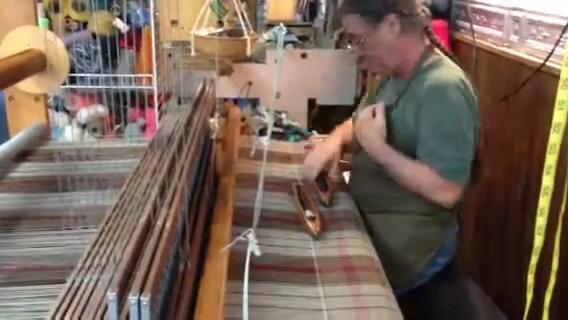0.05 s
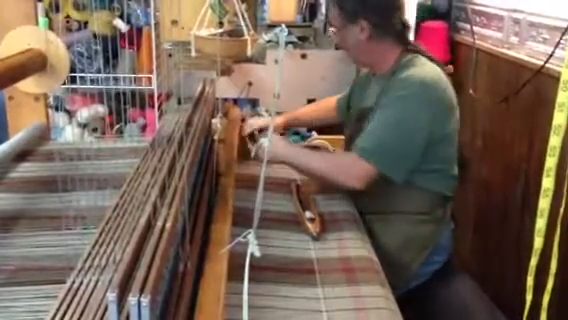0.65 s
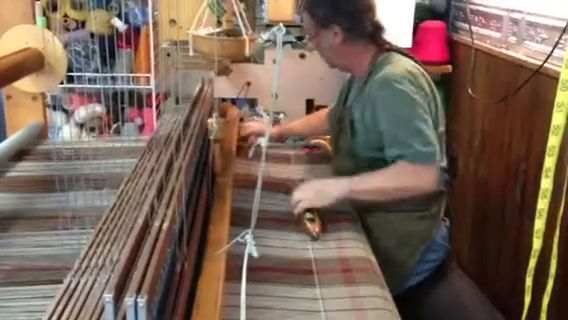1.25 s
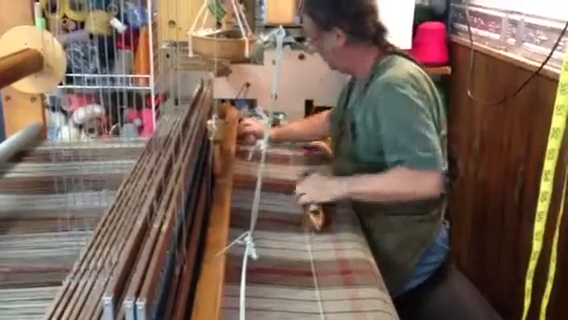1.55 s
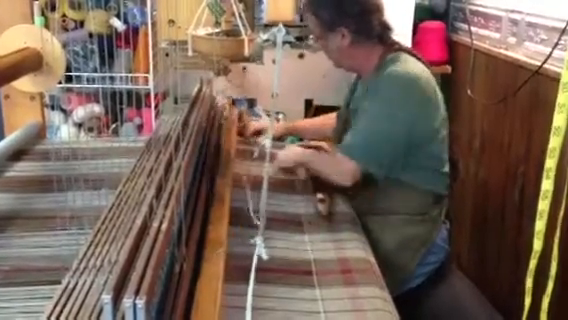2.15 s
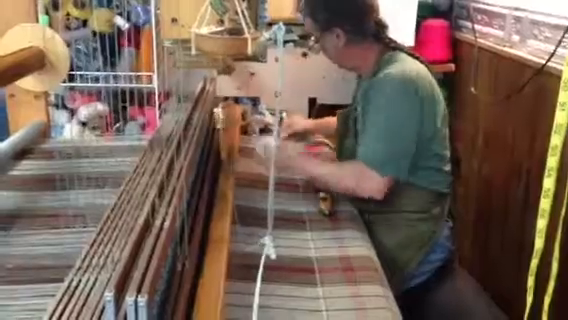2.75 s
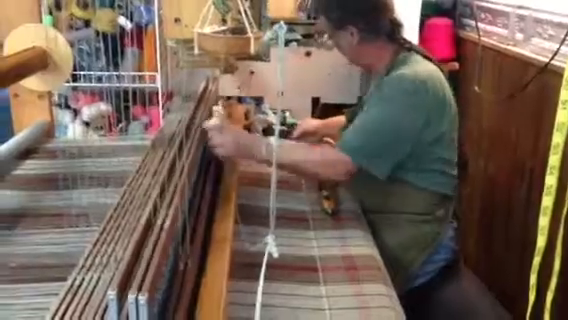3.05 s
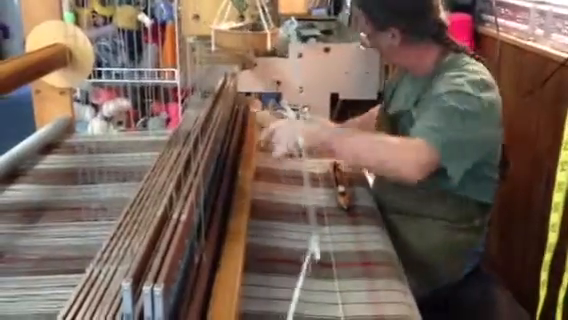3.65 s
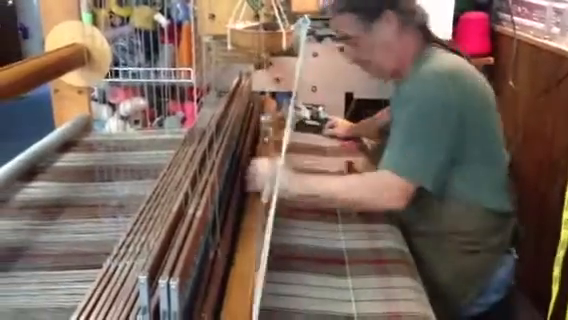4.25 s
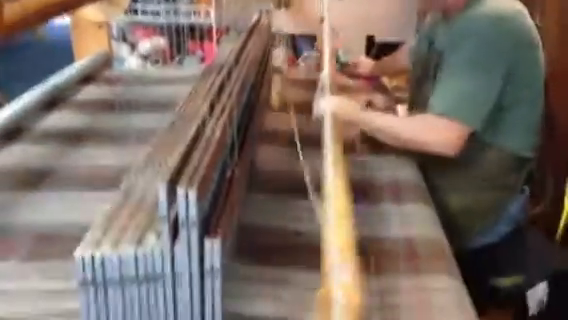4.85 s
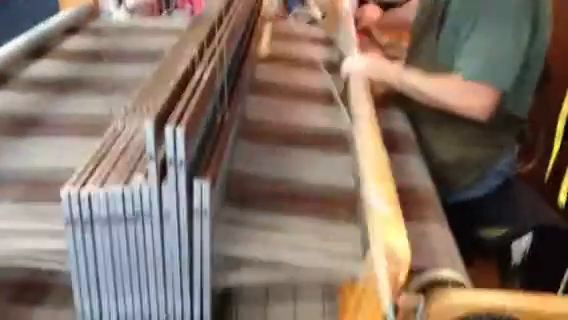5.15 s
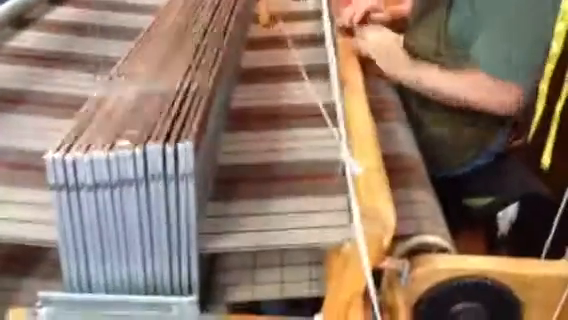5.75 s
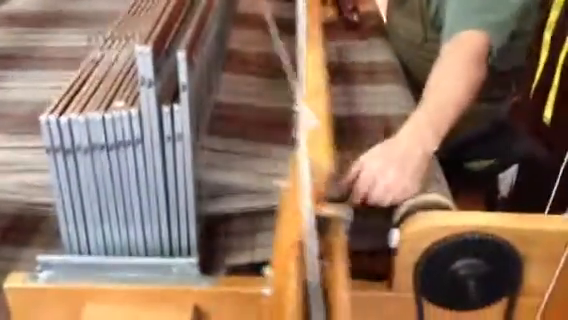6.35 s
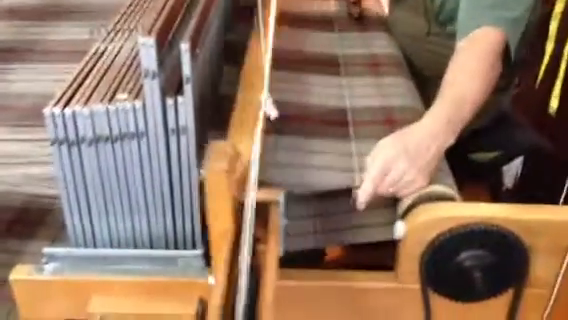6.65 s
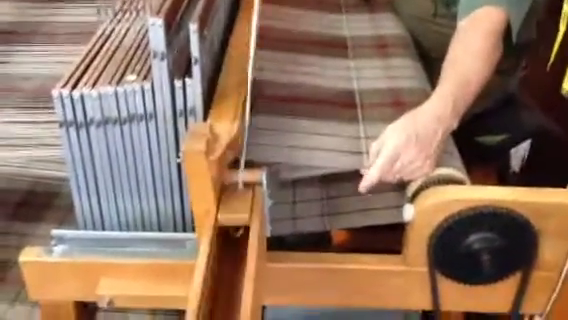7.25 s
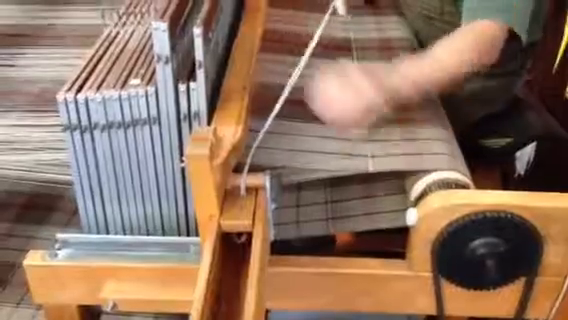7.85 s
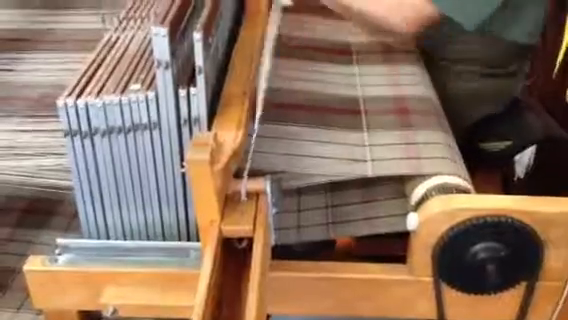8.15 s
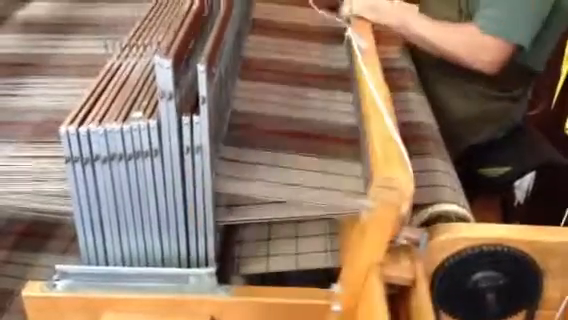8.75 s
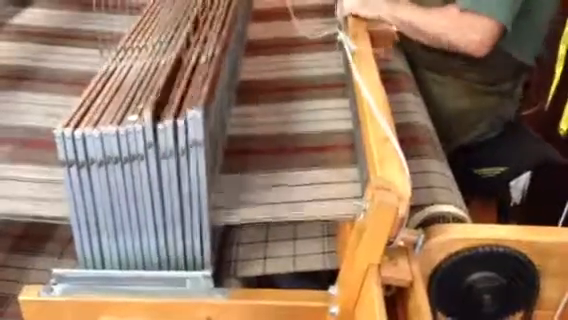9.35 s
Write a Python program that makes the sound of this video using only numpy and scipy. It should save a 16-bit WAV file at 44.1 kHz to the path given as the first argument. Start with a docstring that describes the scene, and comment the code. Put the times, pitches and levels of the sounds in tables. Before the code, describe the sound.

A wooden floor loom is worked close by in a small room. Light, hollow shuttle knocks come from about 0.4 to 1.6 seconds, with a brief wooden drone near 1.2. A sharp clack and a dull slide follow at 1.8, then lighter taps at 2.4. More knocks arrive around 3.5, then tiny gritty thread squeaks and a loud cluster of bright clacks at 4. The beater thumps the frame hard at 5.1, more softly at 6, and firmly at 7 and 8.8, with shuttle clacks between 7.1 and 7.9. Wire heddles rattle from 5.5 to 6 and again from 9 to 9.5, among more knocks. Small steel parts ping near 5.6, 6 and 6.7. Threads rustle and wood rubs on wood between blows, strongest near the end. Throughout, a faint street rumble and the muffled, repeatedly climbing hum of engines come through the wall.

```python
"""A wooden floor loom is worked in a small room, heard from close by in mono.
Shuttle, beater and treadles knock on the frame and ring its modes; the swinging beater makes it drone.
Metal fittings ping, wire heddles rattle as the shafts change, and taut thread squeaks over wood.
In between, warp and cloth rustle and wood slides on wood. Behind it all, a muffled hum climbs again
and again as engines pull away outside."""
import sys
import numpy as np
from scipy import signal
from scipy.fft import rfft, irfft
from scipy.io import wavfile
from scipy.ndimage import uniform_filter1d, minimum_filter1d

SR = 44100
rng = np.random.default_rng(int(sys.argv[2]) if len(sys.argv) > 2 else 0)


def write(x):
    x = np.atleast_2d(x).T
    wavfile.write(sys.argv[1], SR, np.round(np.clip(x, -1, 1) * 32767).astype(np.int16))


N = 414540
TIME = np.arange(N) / SR
HIT_N = SR // 2
HIT_TIME = TIME[:HIT_N]

# Tone of wood rubbing on wood. Each row: frequency in Hz, gain in dB.
RUB_EQ = [(110, -40), (180, -9), (429, -7.5), (586, -4), (760, -9.5), (1050, -11.5), (1240, -9),
          (1930, -17), (2440, -19.5), (4000, -19), (5200, -56), (8800, -120)]


def shuttle_clacks():
    """The shuttle clacks against its box, bright and with little bass."""
    # Each row: start in seconds, level in dB, note in Hz, hardness in dB, scuff in ms, room send in dB.
    hits = [(0.431, -45, 2220, 7, 2.5, -7), (1.747, -25.5, 2430, -10, 17, 3),
            (1.76, -22, 3365, -0.5, 2, -2), (2.403, -36, 1370, -10, 3.8, 3.5),
            (2.448, -37, 2098, -5.5, 6.6, -6.5), (3.36, -30, 1710, -4, 4.5, 2),
            (3.567, -35, 1106, -3.5, 5.4, 0), (3.945, -30.5, 1857, -11.5, 6, 1),
            (3.952, -16, 1778, 3.5, 1.6, -5), (3.972, -24.5, 1870, -11.5, 1.8, -0.5),
            (4.006, -30.5, 1480, -18, 0.47, 8.5), (4.026, -19.5, 2030, 3.5, 1.5, -7.5),
            (4.062, -16, 1427, 4.5, 1.9, -10.5), (4.234, -43.5, 1530, -16, .4, -12),
            (7.141, -29.5, 1080, -0.5, 1, -4.5), (7.198, -42.5, 1920, 2, 4.9, -26.5),
            (7.256, -36.5, 1490, 1, 7.9, 4), (7.272, -18, 1545, -4, 0.21, -13.5),
            (7.363, -37, 1840, -1.5, 0.91, -5.5), (7.739, -25, 1735, -3.5, 4.9, 2),
            (7.854, -29, 2330, 3.5, 5.8, -0.5), (7.915, -41, 2000, -16, 1.5, -7)]
    return blows(hits, low_hz=930, high_hz=3400,
                 bass_db=-29.5, bright_db=-3, snap_db=-14, air_db=-27.5, boom_db=-23.5)


def shuttle_knocks():
    """Shuttles knock hollowly as they are set down and picked up."""
    # Each row: start in seconds, level in dB, note in Hz, hardness in dB, scuff in ms, room send in dB.
    hits = [(0.705, -45.5, 1274, -4, 1.7, -0.5), (0.774, -39.5, 1390, 5.5, 9.5, -6),
            (0.886, -30, 1345, -7, 2, -5), (0.895, -31, 1280, -44, 3.2, 4.5),
            (1.024, -39, 1414, -3, 4.1, 7.5), (1.044, -36.5, 1420, 8.5, 7.5, 8),
            (1.139, -33.5, 1660, 3, 3.5, -2), (1.513, -42.5, 1170, 1, 2.3, 5.5),
            (1.582, -36, 1503, 2.5, 3.1, 3.5), (1.657, -46, 1080, 5.5, 9.6, -16),
            (3.446, -35, 1110, 12, 2.8, -2), (3.509, -29, 1734, 2.5, 5, -2.5),
            (4.576, -57, 1000, 6, 3.7, 4), (8.151, -49.5, 1660, -7, 2.7, -6.5),
            (8.214, -51, 1400, 2, 3.7, 5), (8.376, -50.5, 1070, 4, 1.3, -20),
            (8.503, -38.5, 1660, 12.5, 3.4, -2.5), (8.631, -34, 1250, -3, 4, -5),
            (9.328, -31, 1180, 7, 1.8, -2)]
    return blows(hits, low_hz=794, high_hz=2590,
                 bass_db=-6, bright_db=-11.5, snap_db=-31, air_db=-45, boom_db=-29.5)


def beater_thumps():
    """Beater and treadles thump the frame with weight behind them."""
    # Each row: start in seconds, level in dB, note in Hz, hardness in dB, scuff in ms, room send in dB,
    # weight as extra bass in dB.
    hits = [(4.812, -44, 1270, -13, 2.9, -4, 4), (5.116, -24, 1546, -3, 2.8, 6, -4.5),
            (5.133, -17.5, 1447, 5, 0.74, -5, -3), (5.158, -29.5, 1280, 8.5, 0.26, 0, -2),
            (5.206, -28, 1410, -4, 1.4, -18, 1.5), (5.273, -31.5, 1884, -25, 5.1, -6, -0.5),
            (5.41, -41.5, 1410, -24, 3.6, 3, 5.5), (5.993, -35, 1160, 17, 4.3, 0, 4),
            (6.029, -36, 1420, 12, 3.3, 2.5, -0.5), (6.122, -46.5, 1220, 10, 5.5, -3, 11),
            (6.973, -28, 1075, -9, 1.2, -10, 2.5), (6.981, -24, 1152, -3, 5, -5, 3.5),
            (7.0, -32.5, 1980, -13, 6, -17, 2.5), (8.758, -28, 1510, 7.5, 1.5, 1.5, -3.5),
            (8.789, -19, 1680, -2, 1.1, 1, -6), (8.838, -34, 1630, 12, 0.94, 1.5, 7),
            (8.954, -31, 1540, 0, 9.6, -9, -3.5)]
    return blows(hits, low_hz=606, high_hz=3040,
                 bass_db=-4.5, bright_db=-4, snap_db=-22, air_db=-38, boom_db=-17)


def reed_taps():
    """Reed, shaft bars and fittings give light, bright taps."""
    # Each row: start in seconds, level in dB, note in Hz, hardness in dB, scuff in ms, room send in dB.
    hits = [(3.123, -59, 2340, 8, 5.2, -13), (3.193, -64, 1940, 11.5, 0.33, -5),
            (3.643, -52.5, 1510, 6.5, 7.9, 1.5), (4.159, -45.5, 2120, -11, 3.1, -8.5),
            (4.781, -47, 1904, -7.5, 3.1, 2.5), (4.861, -37.5, 1580, -3, 0.97, -5),
            (5.617, -35.5, 1720, -3, 2.5, 0), (6.718, -43, 2240, 7.5, 1.25, -1.5),
            (6.887, -56, 1860, 8, 3.7, 2), (7.123, -36, 1120, -13.5, 3.3, -22),
            (8.016, -44.5, 2180, -0.5, 2.9, 0.5), (8.421, -44, 1780, -6.5, 7, -8),
            (9.197, -27.5, 1190, -2, 4.5, -2), (9.232, -34.5, 1230, 0, 1.8, -2),
            (9.374, -33.5, 2080, -15, 2.8, -5)]
    return blows(hits, low_hz=714, high_hz=3750,
                 bass_db=-6.5, bright_db=0, snap_db=-3, air_db=-17, boom_db=-26)


def blows(hits, low_hz, high_hz, bass_db, bright_db, snap_db, air_db, boom_db,
          plain_note_hz=1483, longest_t60=0.087, gain_db=26, room_trim_db=-3.5):
    """Each blow is a run of tiny contacts that ring the frame, the struck part and the room."""
    # Resonances of the frame. Each row: frequency in Hz, width in Hz, level in dB.
    frame = [(330, 17, 2.5), (547, 15, 3), (666, 21, -4.5), (800, 70, -9), (1080, 84, -2),
             (1348, 90, -10.5), (1380, 100, 2), (1657, 340, 3.5), (1970, 27, -4), (2093, 100, 2),
             (2290, 48, 0.5), (2490, 90, -1.5), (3090, 120, 5), (3344, 280, 6.5), (3844, 160, -2),
             (3730, 150, -8.5), (3950, 240, 6), (4480, 160, -1), (5140, 68, -10), (6860, 450, 2.5),
             (7400, 150, -9.5), (8960, 150, -11)]
    # Edges in Hz of the bass, middle, bright, snap and air bands.
    band_edges = [170, 700, 2400, 5200, 10000, 15500]
    modes = np.array([from_db(db) * struck(hz, min(ring_time(width), longest_t60))
                      for hz, width, db in frame])
    bands, tails, out = bank(band_edges), room_tails(count=4), np.zeros(N)
    low_cut = signal.butter(2, 380, "high", fs=SR, output="sos")   # slender parts radiate little bass
    for k, (s, db, mid_hz, hard_db, scuff_ms, room_db, *weight_db) in enumerate(hits):
        # the point of contact decides how strongly each mode answers
        strengths = from_db(3 * rng.standard_normal(len(modes))) * rng.choice([-1, 1], len(modes))
        pressure, contact = scuff(scuff_ms)
        body = through(contact, strengths @ modes)
        # the struck part adds three hollow notes; a firm blow rings the middle one more clearly
        pitch_ratio = mid_hz / plain_note_hz
        shift = pitch_ratio ** 0.3
        notes = ((low_hz * shift, -9 + 0.35 * bass_db),
                 (mid_hz, -3 + 0.21 * (db + 29)),
                 (high_hz * shift, -9))
        for hz, note_db in notes:
            body = body + from_db(note_db) * through(contact, struck(hz, t60=0.041))
        crack = wood_crack(pressure)
        boom = through(contact, struck(hz=185, t60=0.36))   # the whole frame booms on the floor
        direct = signal.sosfilt(low_cut, body + energy_one(crack)) + from_db(boom_db) * boom
        # the room hears all sides of the loom, so single notes stand out less in it
        radiated = energy_one(direct) + from_db(1) * energy_one(signal.sosfilt(low_cut, crack))
        echo = through(radiated, tails[k % len(tails)])
        # slow or heavy blows give more bass, high notes more brightness, hard contacts more top
        push_db = np.log2(scuff_ms / 3) + sum(weight_db)
        lift_db = 0.27 * hard_db + 9.5 * np.log2(pitch_ratio)
        eq_db = (bass_db + push_db, 0, bright_db + lift_db, snap_db + hard_db, air_db + 1.5 * hard_db)
        for sos, band_db in zip(bands, eq_db):
            near, far = signal.sosfilt(sos, signal.sosfilt(sos, [direct, echo]))
            band = energy_one(near) + from_db(room_db + room_trim_db) * energy_one(far)
            add(out, s, from_db(gain_db + db + band_db) * band)
    return out


def scuff(ms):
    """Pressure and chatter of a contact: a square hit is over at once, a glancing one slides."""
    progress = HIT_TIME * 1000 / ms
    pressure = energy_one(progress * np.exp(-progress))
    chatter = pressure * rng.standard_normal(HIT_N) ** 3
    for _ in range(3):   # bending waves disperse, so the lows arrive a little later
        chatter = signal.lfilter([-0.7, 1], [1, -0.7], chatter)
    return pressure, chatter


def wood_crack(pressure, t60=0.024):
    """The crowd of short modes between the strong ones blurs into a burst of noise."""
    envelope = np.sqrt(np.abs(through(pressure ** 2, dying(t60) ** 2)))
    return envelope * signal.lfilter([1], [1, -0.6], rng.standard_normal(HIT_N))


def fitting_pings(beat_hz=35, twin_db=-9):
    """Small steel parts ring with a close, beating pair of modes."""
    # Each row: start in seconds, level in dB, pitch in Hz, t60 in seconds.
    pings = [(4.784, -41, 10500, 0.062), (5.645, -29.5, 5220, 0.11), (5.996, -32, 5140, 0.21),
             (6.721, -23, 10470, 0.15), (8.42, -44, 10500, 0.072)]
    out = np.zeros(N)
    for s, db, hz, t60 in pings:
        tone = np.sin(2 * np.pi * hz * HIT_TIME)
        twin = from_db(twin_db) * np.sin(2 * np.pi * (hz + beat_hz) * HIT_TIME)
        add(out, s, from_db(db) * (tone + twin) * (dying(t60) - dying(0.0033)))
    return out


def thread_squeaks(jitter=0.07, grit_db=-3, room_db=-7, gain_db=1):
    """Taut thread sticks and slips over wood at an unsteady rate, in short gritty chirps."""
    # Each row: start in seconds, level in dB, pitch in Hz, length in seconds.
    chirps = [(3.675, -39.5, 1759, 0.024), (3.703, -39, 2026, 0.013), (3.758, -42, 1838, .028),
              (3.783, -40, 1966, 0.026), (3.81, -41, 1966, 0.021), (3.85, -38, 1912, 0.036),
              (3.88, -42.5, 1965, 0.017), (3.916, -40.5, 2092, 0.011), (7.532, -60.5, 2000, .014),
              (7.583, -58.5, 2150, .02), (7.628, -61, 1516, 0.025)]
    # Each row: harmonic number, level in dB.
    partials = [(1, 5.5), (2, 9.5), (3, -3), (4, -21)]
    out, wobble = np.zeros(N), drift(200)
    grit_band = signal.butter(2, (1500, 7500), "band", fs=SR, output="sos")
    for s, db, hz, length in chirps:
        unsteadiness = wobble[round(s * SR):][:HIT_N] + 4 * rng.standard_normal(HIT_N)
        phase = 2 * np.pi * np.cumsum(hz * (1 + jitter * unsteadiness)) / SR
        tone = rms_one(sum(from_db(partial_db) * np.sin(k * phase) for k, partial_db in partials))
        grit = rms_one(signal.sosfilt(grit_band, rng.standard_normal(HIT_N)))
        pull = np.sin(np.pi * np.sqrt(np.minimum(HIT_TIME / length, 1)))
        add(out, s, from_db(db + gain_db) * pull * (tone + from_db(grit_db) * grit))
    return out + from_db(room_db) * excite(out, room_tails(count=1)[0])


def frame_drone(gain_db=-3):
    """Friction in the swinging beater's pivots keeps a few frame modes ringing."""
    # Each row: peak time in seconds, level in dB, rise and fall in seconds.
    swings = [(1.17, -39, 0.039, .12), (3.1, -58, 0.052, .2), (4.9, -47.5, 0.18, 0.43),
              (8.63, -45.5, 0.25, 0.19)]
    # Each row: frequency in Hz, width in Hz, level in dB.
    resonances = [(700, 33, -14), (794, 16, 13), (830, 39, 12)]
    friction = grains(per_s=900, spread_db=1.5)
    modes = sum(from_db(db) * struck(hz, ring_time(width)) for hz, width, db in resonances)
    return from_db(gain_db) * swells(swings) * rms_one(excite(friction, modes))


def heddle_rattle(rattle_db=10.5, rumble_db=-9, attack_s=0.025, fall_db_per_s=230):
    """Hundreds of wire heddles jostle on their bars while the shaft frames rub in their guides."""
    # Each row: start in seconds, length in seconds, level in dB.
    shaft_changes = [(5.476, .19, -43.5), (5.781, 0.13, -42), (9.065, 0.16, -41), (9.367, .1, -35.5)]
    # Tone of the wires. Each row: frequency in Hz, gain in dB.
    wire_eq = [(530, -51), (900, -13), (1120, -16), (1420, -13), (2720, -5.5), (4180, 1), (4880, -3.5),
               (5570, 0.5), (7410, -5), (14100, -8), (15500, -14)]
    wires = sum(excite(grains(per_s=640, spread_db=0.5), noise_burst(t60=0.0097)[:1024])
                for _ in range(5))
    rattle = from_db(rattle_db - 0.5 * drift(30)) * coloured(wires, wire_eq)
    rumble = from_db(rumble_db) * coloured(grains(per_s=1100, spread_db=-2.5), RUB_EQ)
    motion = np.zeros(N)
    for s, length, db in shaft_changes:
        attack = np.clip((TIME - s) / attack_s, 0, 1)
        motion += attack * from_db(db - fall_db_per_s * np.maximum(TIME - s - length, 0))
    return motion * (rattle + rumble)


def thread_rustle(gain_db=1, tick_db=-7, idle_db=-73):
    """Threads catch and slip across the warp and in the reed; now and then one plucks free with a tick."""
    # Each row: peak time in seconds, level in dB, rise and fall in seconds.
    pulls = [(1.08, -68, 1, 0.8), (1.8, -62.5, .7, 0.8), (3.11, -56.5, .12, 1.6), (3.82, -58.5, .55, 0.28),
             (3.96, -44.5, 0.088, -0.01), (4.58, -58, .22, .25), (5.25, -55, 0.36, 1.0),
             (5.84, -50.5, 1.0, 1.07), (6.23, -50.5, 0.37, 0.37), (7.0, -50.5, 0.12, 0.16),
             (7.26, -59, 0.37, 1), (7.9, -63.5, 0.84, .3), (8.32, -62.5, 0.21, -0.1),
             (8.91, -45.5, 0.13, -0.3), (9.2, -40, 0.39, 0.3)]
    # Tone of the threads. Each row: frequency in Hz, gain in dB.
    thread_eq = [(530, -32.5), (900, -8), (1260, -27), (1450, -2.5), (1580, -8), (2000, -2.5), (4390, 1),
                 (13900, -13.5), (15500, -17.5)]
    strokes = swells(pulls)
    pulling = np.hypot(strokes, from_db(idle_db))
    catching_db = 1.5 * drift(45)
    ticks = rms_one(excite(grains(per_s=22, spread_db=3), noise_burst(t60=0.025)))
    fibres = rms_one(grains(per_s=7800, spread_db=1.5))
    texture = fibres + from_db(tick_db) * ticks * strokes / pulling
    return pulling * from_db(gain_db + catching_db) * coloured(texture, thread_eq)


def wood_slides(gain_db=-1, idle_db=-72):
    """Wood slides on wood with a dull, grainy rub."""
    # Each row: peak time in seconds, level in dB, rise and fall in seconds.
    slides = [(1.09, -50.5, 0.22, 0.27), (1.76, -37, 0.041, 0.17), (3.54, -42.5, .17, 0.33),
              (3.96, -38.5, .03, 0.26), (4.62, -70, 0.14, 0.14), (5.21, -36.5, 0.33, 0.17),
              (5.625, -35.5, 0.13, 0.096), (5.8, -38.5, 0.075, 0.072), (6.0, -40.5, 0.019, 0.26),
              (6.22, -58, 0.22, 1), (7.18, -49, 0.24, 0.36), (7.87, -41.5, 0.11, 0.13),
              (8.61, -46, 0.29, 0.37), (8.92, -40.5, 0.32, 0.34), (9.21, -31, 0.08, 0.098),
              (9.39, -31, 0.067, .12)]
    sliding = np.hypot(swells(slides), from_db(idle_db))
    return sliding * from_db(gain_db) * coloured(grains(per_s=1700, spread_db=2.5), RUB_EQ)


def room_tails(count, build_s=0.0044):
    """Diffuse reverb tails, one for each place on the loom; the top treble dies first."""
    # Each row: frequency in Hz, t60 in seconds.
    decay_times = [(200, 0.24), (500, 0.37), (1200, .38), (2500, 0.29), (5000, 0.18), (9000, 0.26),
                   (15000, 0.1)]
    edges = np.geomspace(100, 18000, 9)
    tails = 0
    for sos, hz in zip(bank(edges), np.sqrt(edges[1:] * edges[:-1])):
        noise = signal.sosfilt(sos, rng.standard_normal((count, HIT_N)))
        tails = tails + noise * dying(at_hz(decay_times, hz))
    return [energy_one(tail * (1 - np.exp(-HIT_TIME / build_s))) for tail in tails]


def engines(ease_s=6, swell_db=8, coast_hz_per_s=10, coast_db_per_s=46, attack_s=0.13, wall_db=-2.5):
    """Each engine climbs ever more slowly, swells, then coasts; only low exhaust notes pass the wall."""
    # Each row: start in seconds, length in seconds, starting cycle rate in Hz, starting climb in Hz
    # per second, level at full load in dB, third harmonic against the second at full load in dB.
    runs = [(0.0, .3, 61.8, 28, -60, -17), (0.898, 2.5, 57.74, 8.5, -53, -3),
            (4.702, 1.42, 62.3, 11, -58.5, -24), (6.1, 2.9, 52.26, 9.4, -59, -18.5)]
    out = np.zeros(N)
    for s, length, start_hz, climb, db, third_db in runs:
        pulling, coasting = np.clip(TIME - s, 0, length), np.clip(TIME - s - length, 0, 2)
        hz = start_hz + climb * ease_s * (1 - np.exp(-pulling / ease_s)) - coast_hz_per_s * coasting
        phase = 2 * np.pi * np.cumsum(hz * (1 + 0.0013 * drift(20))) / SR
        load_db = swell_db * (pulling / length - 1) - coast_db_per_s * coasting
        upper_db = third_db + 1.2 * load_db   # the upper notes grow with the load
        notes = sum(from_db(note_db + drift(20)) * np.sin(k * phase)
                    for k, note_db in enumerate((-25, 0, upper_db, upper_db - 13), start=1))
        attack = np.clip((TIME - s) / attack_s, 0, 1)
        out += np.sqrt(2) * attack * from_db(db + wall_db + load_db - 0.7 * drift(5.2)) * notes
    return out


def street_rumble(gain_db=-2):
    """Street noise comes through the wall as a dull rumble that rises and falls."""
    # Each row: time in seconds, level in dB.
    fader = [(0.0, -61.5), (1.4, -62.5), (2.0, -60), (3.3, -57.5), (4.3, -67), (5.0, -65), (7.0, -60),
             (7.4, -76.5), (8.5, -61)]
    # Each row: frequency in Hz, gain in dB.
    street_eq = [(13, -60), (22, -31), (102, -19), (136, -6.5), (173, -7.5), (210, -8), (345, -15),
                 (372, -34.5), (413, -25.5), (800, -33.5), (1040, -66), (1760, -120)]
    level_db = np.interp(TIME, *np.transpose(fader))
    return from_db(level_db + gain_db) * coloured(rng.standard_normal(N), street_eq)


def faint_hiss(level_db=-72):
    """A steady bed of noise lies beneath everything."""
    # Each row: frequency in Hz, gain in dB.
    hiss_eq = [(240, -23), (400, 4), (511, -15.5), (683, -0.5), (761, -19.5), (1150, -23), (15500, -13.5)]
    return from_db(level_db) * coloured(rng.standard_normal(N), hiss_eq)


def from_db(db):
    """Decibels to gain."""
    return 10 ** (np.asarray(db) / 20)


def rms_one(x):
    """Scale to rms 1."""
    return x / np.sqrt(np.mean(x ** 2) + 1e-20)


def energy_one(x):
    """Scale to energy 1."""
    return x / np.sqrt(np.sum(x ** 2) + 1e-20)


def at_hz(points, hz):
    """Read a table on a log-frequency axis."""
    f, value = np.transpose(points)
    return np.interp(np.log(hz + 1e-9), np.log(f), value)


def dying(t60):
    """Envelope that falls 60 dB in t60 seconds."""
    return np.exp(-np.log(1000) * HIT_TIME / t60)


def ring_time(width_hz):
    """The t60 of a resonance: the narrower, the longer it rings."""
    return np.log(1000) / np.pi / width_hz


def struck(hz, t60):
    """One ringing mode, energy 1."""
    return energy_one(np.sin(2 * np.pi * hz * HIT_TIME) * dying(t60))


def noise_burst(t60):
    """White noise that dies away."""
    return rng.standard_normal(HIT_N) * dying(t60)


def through(force, response):
    """What a body or room gives back for a short force, energy 1."""
    return energy_one(signal.fftconvolve(force, response)[:HIT_N])


def excite(track, response):
    """Ring a response with a whole track."""
    return signal.oaconvolve(track, response)[:N]


def swells(strokes):
    """Gain of strokes that build and fade by 20 dB per rise or fall time, at least 0.01 and 0.12 s."""
    power = 0
    for s, db, rise, fall in strokes:
        from_peak = np.maximum((s - TIME) / max(rise, 0.01), (TIME - s) / max(fall, 0.12))
        power = power + from_db(db - 20 * from_peak) ** 2
    return np.sqrt(power)


def drift(per_s):
    """A curve that glides between random values of spread 1."""
    return np.interp(TIME * per_s, np.arange(2000), rng.standard_normal(2000))


def grains(per_s, spread_db):
    """Tiny contacts at random moments and of uneven size."""
    clicks = (rng.random(N) < per_s / SR) * rng.choice([-1, 1], N)
    return clicks * from_db(spread_db * np.minimum(rng.exponential(1, N), 4))


def coloured(x, eq):
    """Apply an EQ curve that falls away steeply beyond its ends; rms 1."""
    hz = np.arange(N // 2 + 1) * SR / N + 0.00085
    ends = 1 / np.sqrt(1 + (eq[0][0] / hz) ** 6 + (hz / eq[-1][0]) ** 6)
    return rms_one(irfft(rfft(x) * from_db(at_hz(eq, hz)) * ends, N))


def bank(edges, overlap=1.028):
    """Slightly overlapping band-passes between neighbouring edges."""
    return [signal.butter(2, (low / overlap, high * overlap), "band", fs=SR, output="sos")
            for low, high in zip(edges, edges[1:])]


def add(track, s, sound):
    """Mix a sound in at s seconds."""
    at = round(s * SR)
    track[at:at + len(sound)] += sound[:max(N - at, 0)]


def scene():
    """The loom over its background, the same in both channels."""
    knocks = shuttle_clacks() + shuttle_knocks() + beater_thumps() + reed_taps()
    ringing = fitting_pings() + thread_squeaks() + frame_drone()
    textures = heddle_rattle() + thread_rustle() + wood_slides()
    background = faint_hiss() + street_rumble() + engines()
    mono = knocks + ringing + textures + background
    return np.array([mono, mono])


def record(dry, ceiling=0.8, cutoff_hz=15500):
    """A fast limiter holds down the loudest peaks, and the top is cut steeply."""
    needed_gain = np.minimum(1, ceiling / (np.abs(dry) + 1e-9))
    gain = uniform_filter1d(minimum_filter1d(needed_gain, size=67), size=67)
    high_cut = signal.ellip(10, 0.2, 70, cutoff_hz, fs=SR, output="sos")
    return signal.sosfilt(high_cut, dry * gain)


dry = scene()
out = record(dry)
write(out)
```